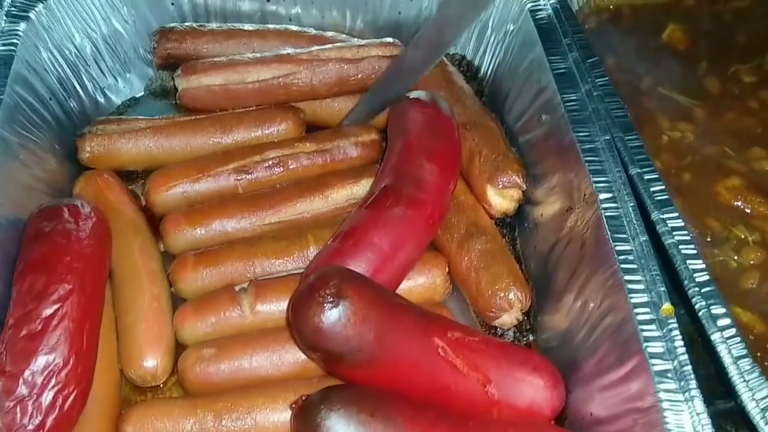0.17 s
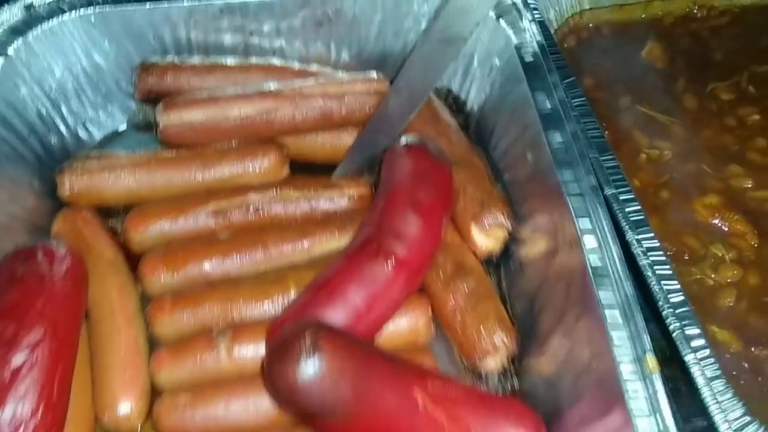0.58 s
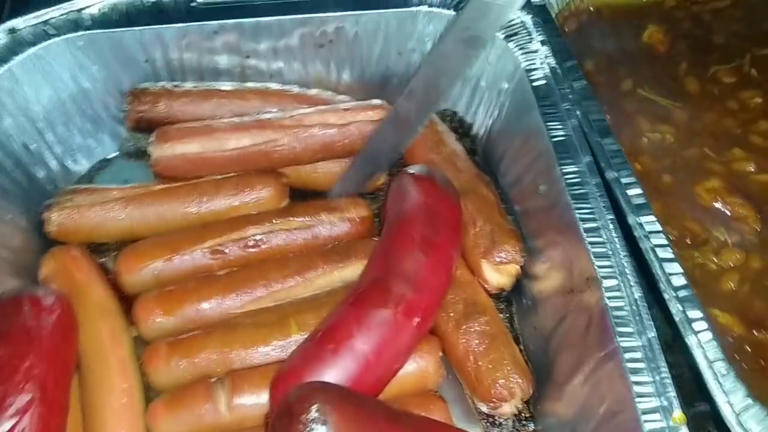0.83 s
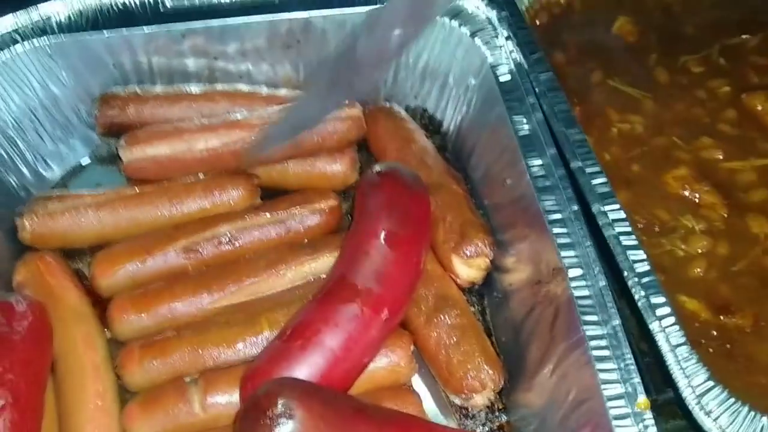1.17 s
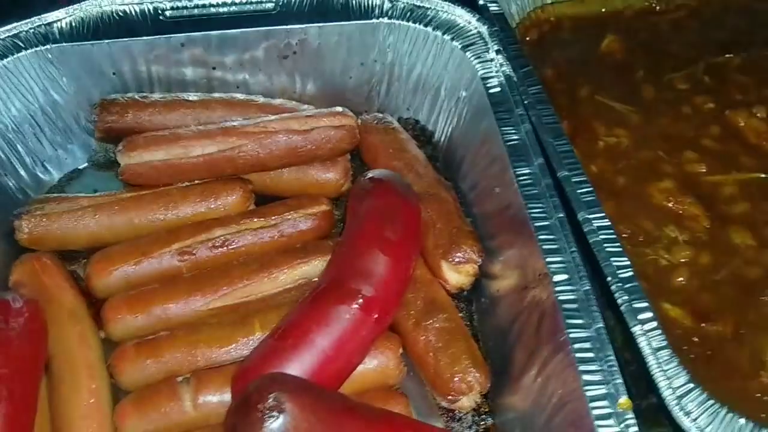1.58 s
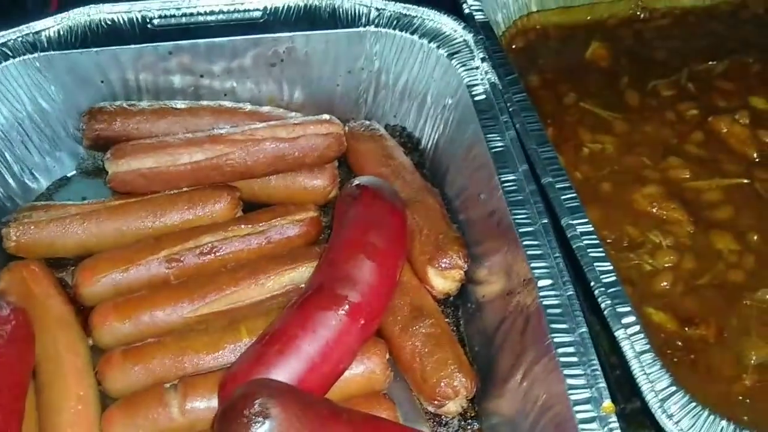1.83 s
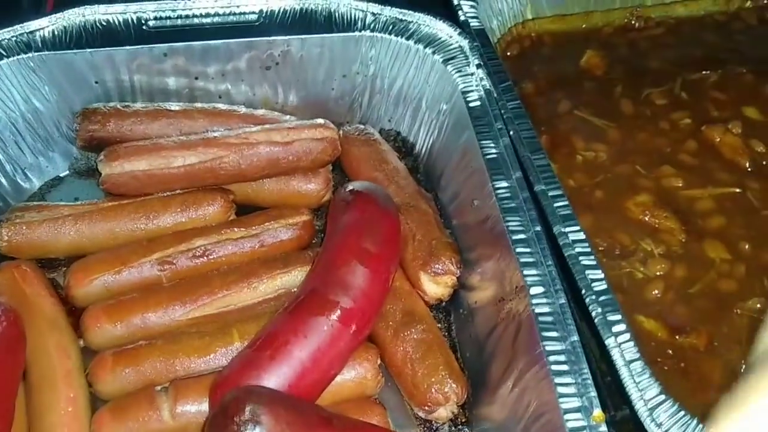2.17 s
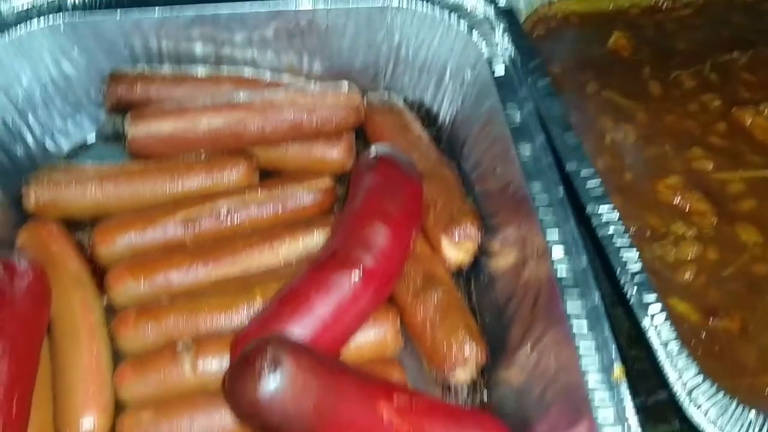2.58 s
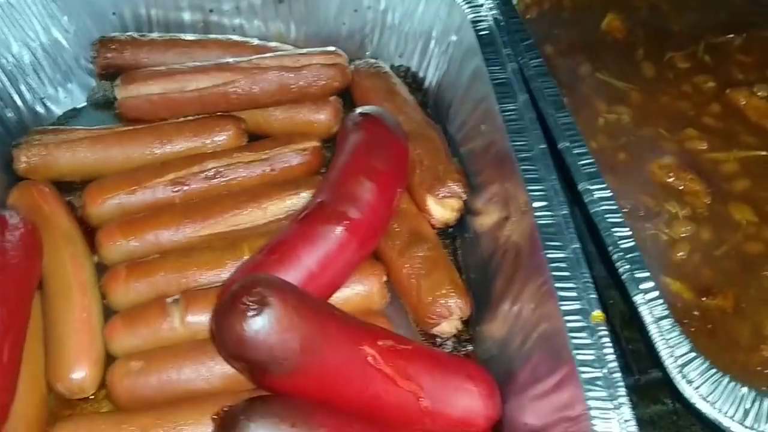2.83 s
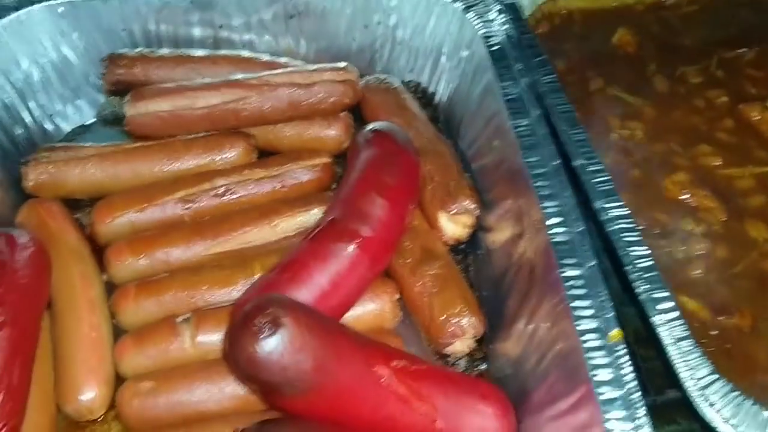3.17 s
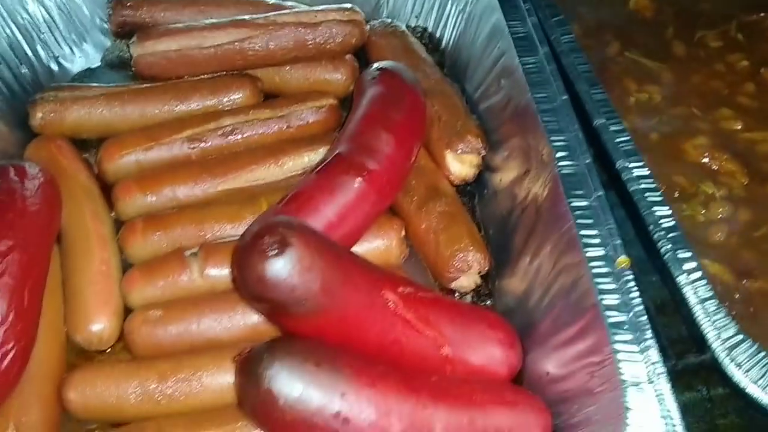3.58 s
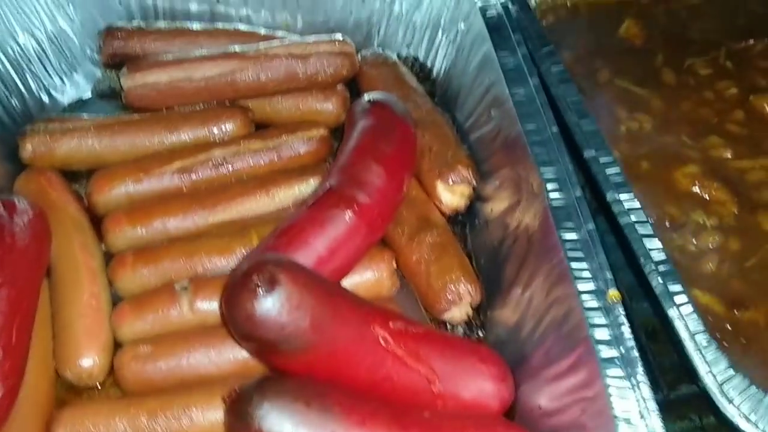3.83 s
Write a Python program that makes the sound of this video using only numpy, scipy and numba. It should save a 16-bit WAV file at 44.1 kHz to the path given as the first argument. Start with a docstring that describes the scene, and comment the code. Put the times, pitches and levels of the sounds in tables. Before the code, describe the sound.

Short rasps, dull pops and bright crinkles come from an aluminium pan as a knife prises sausages loose in a small kitchen.

```python
"""A knife prises sausages loose in a throwaway aluminium foil pan, close by in a small kitchen.
The tip sticks and slips over the ribbed foil, making a rasp, and the thin sheet buckles with dull
pops and bright crinkles. Both make the pan ring, though the food soon damps it, and each push
makes it shudder. Once, the whole pan floor flips with a loud pop.
Behind it are a short room echo and the rush and hum of an appliance."""
import sys
import numpy as np
from scipy import signal
from scipy.fft import rfft, irfft
from scipy.io import wavfile
from scipy.ndimage import uniform_filter1d
from numba import njit

SR = 44100
rng = np.random.default_rng(int(sys.argv[2]) if len(sys.argv) > 2 else 0)


def wrap_up_sound(samples):
    """Save the sound to the file named by the first command line argument, as 16-bit audio."""
    columns = np.atleast_2d(samples).T
    # keep every value between -1 and 1, then stretch to whole-number steps
    tamed = np.clip(columns, -1, 1)
    steps = np.round(tamed * 32767).astype(np.int16)
    wavfile.write(sys.argv[1], SR, steps)


N = 176708
TIME = np.arange(N) / SR

# the tone of the creased foil, whose many notes blur together: pitch_hz, level_db
FOIL_TONE = [(60, -22), (200, 15.5), (450, -0.5), (700, -1.5), (1200, -9), (1650, -4.5), (2500, 2.5),
             (3500, -8.5), (4300, -7), (6000, -13), (8200, -21.5), (10500, -16), (15500, -21.5)]
# each push of the knife: start_s, length_s, panel_pitch_hz, level_db, swell_db, treble_db, song_db
PUSHES = [ (0.474, 0.042, 850, -37.5, -6, -1.5, 2), (0.586, 0.063, 902, -42.5, 4.5, -13.5, -8),
          (0.645, 0.079, 802, -33, 1.5, -9, -14), (.74, .13, 620, -32, -7.5, -16.5, -7),
          (0.871, 0.1, 1037, -38.5, 2.5, -15, -10), (1.019, 0.066, 1240, -37.5, -7.5, -12.5, 9),
          (1.076, 0.041, 1180, -27, -9, -8, -0.5), (1.231, 0.042, 1110, -38, -3.5, -21, -10),
          (1.718, 0.03, 910, -35.5, -0.5, -2, -3), (2.126, 0.037, 912, -44.5, -7, -9.5, 1),
          (2.196, 0.044, 850, -38, -10, -12, -5.5), (2.51, 0.26, 707, -50.5, -18.5, -18, -6),
          (2.731, 0.079, 824, -37, -0.5, -17.5, -16), (2.83, 0.086, 778, -28, -15.5, -16, -9),
          (3.344, 0.059, 900, -51.5, -14.5, -24, -2), (3.392, 0.051, 856, -41.5, -2, -21.5, -8),
          (3.456, 0.079, 1020, -40.5, 4, -21.5, -17), (3.543, 0.074, 860, -22.5, -21.5, -30, -23),
          (3.746, 0.056, 890, -51, 7.5, -0.5, -1.5), (3.975, 0.069, 628, -76.5, -1, 15, -7)]


def undb(db):
    """Turn decibels into a number to multiply by."""
    return 10 ** (np.asarray(db) / 20)


def unit(x):
    """Scale a sound to an average strength (rms) of 1."""
    return x / np.sqrt(np.mean(x ** 2))


def fade(t, t60):
    """A dying away that is 60 dB down after t60 seconds."""
    return np.exp(-np.log(1000) * t / t60)


def wander(turns_per_s):
    """A slow random drift, about 1 to either side of zero."""
    points = rng.standard_normal(2048)
    return 1.2 * np.interp(TIME * turns_per_s, np.arange(len(points)), points)


def colour(x, points):
    """Shape the tone along a curve of (pitch_hz, level_db) points."""
    hz, db = np.transpose(points)
    f = np.maximum(np.fft.rfftfreq(len(x), 1 / SR), 1)
    return irfft(rfft(x) * undb(np.interp(np.log(f), np.log(hz), db)), len(x))


def split(x):
    """Split a sound into body (low), crack (middle) and fizz (high)."""
    # the edges of the three ranges: low_hz, high_hz
    bands = [(70, 1700), (1700, 7000), (7000, 18000)]
    return [signal.sosfilt(signal.butter(4, band, "bandpass", fs=SR, output="sos"), x) for band in bands]


@njit
def resonate(x, hz, q):
    """Let through what lies near a pitch given for every sample; a higher q is narrower."""
    y, band_state, low_state = np.empty(len(x)), 0., 0.
    for i in range(len(x)):
        step = np.tan(np.pi * hz[i] / SR)
        band = (band_state + step * (x[i] - low_state)) / (1 + step * (step + 1 / q))
        band_state = 2 * band - band_state
        low_state += 2 * step * band
        y[i] = band / q
    return y


def focus(x, hz, q):
    """Keep what lies near a steady or moving pitch, at strength 1."""
    return unit(resonate(x, hz * np.ones(len(x)), float(q)))


def note(t, hz, t60):
    """One vibration left to die away, at strength 1."""
    return unit(np.cos(2 * np.pi * hz * t) * fade(t, t60) * (1 - np.exp(-2 * hz * t)))


def appliance():
    """An airy rush makes the casing ring, over a slightly wavering motor hum."""
    # the tone of the rush: pitch_hz, level_db
    rush_tone = [(25, -20), (42, -12.5), (60, -15), (95, 2.5), (145, -8.5), (200, -16), (260, -2),
                 (340, -10), (540, -12.5), (700, -8), (1100, -24), (3300, -31), (8000, -43.5), (15500, -39)]
    # how loud the rush is over time: time_s, level_db
    rush_levels = [(0, -57.5), (.45, -58), (1.4, -55.5), (2.3, -58), (3.1, -58), (4, -57)]
    # the notes of the casing: pitch_hz, width_hz, level_db
    casing_notes = [(239.5, 3.3, -60), (642, 3.2, -64.5)]
    # the notes of the motor: pitch_hz, level_db
    hum_notes = [(58.3, -67), (118.5, -67.5)]
    swell = undb(np.interp(TIME, *np.transpose(rush_levels)) + .8 * wander(6))
    out = unit(colour(rng.standard_normal(N), rush_tone)) * swell
    for hz, width, db in casing_notes:
        out += undb(db) * unit(swell * focus(rng.standard_normal(N), hz, q=hz / width))
    for hz, db in hum_notes:
        phase = 2 * np.pi * np.cumsum(hz * (1 + 0.0055 * wander(12))) / SR
        out += np.sqrt(2) * undb(db + 2 * wander(7)) * np.sin(phase)
    return out


def kitchen_echo(x, wet_db, t60s=(0.26, 0.27, 0.23), build_s=0.003):
    """Sound bounces off the hob and the near walls; the highs die first."""
    t = np.arange(SR // 2) / SR
    parts = split(rng.standard_normal(len(t)))
    tail = sum(part * fade(t, t60) for part, t60 in zip(parts, t60s))
    tail *= 1 - np.exp(-(t / build_s) ** 2)
    return undb(wet_db) * signal.fftconvolve(x, tail / np.linalg.norm(tail))[:N]


def pan_wall_echo(x):
    """Quick echoes off the pan's ribbed sides waver as the point of contact moves."""
    t = np.arange(SR // 25) / SR
    echoes = rng.standard_normal(len(t)) * fade(t, t60=.035)
    bright = colour(x, [(120, -19), (300, -42), (700, -26.5), (1200, -23.5), (2500, -3.5), (8000, -6.5)])
    return signal.fftconvolve(bright * wander(20), echoes / np.linalg.norm(echoes))[:N]


def pressure(start, length, swell_db, grip_s=0.014, release_t60=0.12):
    """One push: the tip bites, bears down or eases off, then comes to rest."""
    t = TIME - start
    held = undb(swell_db * np.clip(t / length, 0, 1))
    return np.clip(t / grip_s, 0, 1) * held * fade(np.maximum(t - length, 0), release_t60)


def pan_shudder(level_db=-40, effort_power=0.2):
    """Every push rocks the whole pan; this low rumble grows only slowly with the force."""
    # the tone of the full pan rocking on the hob: pitch_hz, level_db
    rumble_tone = [(40, -48), (115, -2), (160, -8), (240, 5), (300, -18.5), (450, -13), (900, -48),
                   (3000, -83)]
    effort = sum(pressure(start, length, swell_db) * undb(db)
                 for start, length, _, db, swell_db, *_ in PUSHES)
    return undb(level_db) * effort ** effort_power * unit(colour(rng.standard_normal(N), rumble_tone))


def pan_ring(sheet_t60, sheet_db=0.5, scatter_db=5.94):
    """The pan rings after one click; each spot that is touched gives a new mix of its notes."""
    # the notes of the full pan (wider ones die sooner): pitch_hz, width_hz, level_db
    pan_notes = [(242.7, 73, 5.5), (364.5, 45, 0), (618, 140, -7), (614.3, 54, 5), (758, 50, 1),
                 (734, 8.6, -21.5), (880, 18, 2.5), (1120, 11, -5), (1170, 81, 0.5), (1311, 47, -3.5),
                 (1455, 15, -0.5), (1840, 64.7, -14), (2550, 78, -12.5), (2576, 19, -4), (3015, 35, -21),
                 (3284, 22, -6), (4030, 15, -18.5)]
    t = np.arange(SR // 7) / SR
    hz, width, db = np.transpose(pan_notes)[:, :, None]
    weight = rng.choice([-1, 1], hz.shape) * undb(db + scatter_db * rng.standard_normal(hz.shape))
    notes = np.sum(weight * width * np.sin(2 * np.pi * hz * t) * np.exp(-np.pi * width * t), axis=0)
    sheet = colour(rng.standard_normal(len(t)), FOIL_TONE) * fade(t, sheet_t60)
    return unit(notes) + undb(sheet_db) * unit(sheet)


def floor_pop(width_cycles=0.8):
    """The whole floor of the pan gives way in one big swing."""
    # the flip of the floor: time_s, pitch_hz, peak_db
    flip = (.7233, 900, -6)
    time_s, pitch_hz, peak_db = flip
    cycles = (TIME - time_s) * pitch_hz
    swing = np.sin(2 * np.pi * cycles) * np.exp(-(cycles / width_cycles) ** 2)
    return undb(peak_db) * swing / np.max(swing)


def foil_snaps(tick_db=-3, ping_db=-4, overtone_ratio=1.7, overtone_db=-5):
    """A patch of foil flips over: a tick, the patch's own note and ping, and the ring of the pan."""
    # each buckle of the foil or knock of the blade:
    # start_s, panel_pitch_hz, ping_pitch_hz, body_db, crack_db, fizz_db
    snaps = [ (0.4863, 754, 2666, -24.5, -25.5, -54), (0.491, 1074, 2760, -24.5, -56, -67),
             (0.4988, 655, 2300, -26, -39, -46), (0.5925, 1013, 1850, -31, -41.5, -53),
             (0.6184, 890, 2190, -29, -35, -47.5), (0.674, 975, 1810, -28, -34, -55),
             (0.7224, 590, 1720, -17.5, -34, -56), (0.725, 514, 2290, -22.5, -39, -35),
             (0.7341, 638, 1990, -25, -39, -45), (0.922, 1460, 2350, -32.5, -43, -63),
             (0.936, 880, 2280, -41.5, -34, -45.5), (0.975, 1190, 2370, -50, -46, -47),
             (1.0117, 1030, 1780, -31.5, -41.5, -54), (1.0932, 987, 1860, -28, -36, -41),
             (1.0968, 1050, 1684, -22, -27.5, -33), (1.107, 995, 2175, -26, -33, -39),
             (1.1935, 1200, 1740, -40.5, -46.5, -52.5), (1.232, 1422, 2600, -27, -32.5, -49),
             (1.7161, 910, 3520, -30.5, -35.5, -31), (1.7226, 883, 3670, -21, -45, -46),
             (1.725, 590, 3570, -31, -55, -56), (2.132, 992, 1950, -35.5, -37.5, -41),
             (2.204, 1260, 3053, -41, -33, -44), (2.454, 896, 2280, -48, -55.5, -62.5),
             (2.706, 1162, 2670, -46, -55, -63), (2.7419, 858, 2480, -31.5, -43, -69),
             (2.755, 735, 2320, -29, -40, -49), (2.777, 829, 2210, -35, -39, -44),
             (2.8, 844, 2220, -38, -42, -54), (2.8331, 808, 1928, -28, -26.5, -35),
             (2.841, 869, 2227, -23.5, -29.5, -46), (3.238, 717, 2005, -70, -57, -69),
             (3.422, 880, 2514, -38, -41.5, -65), (3.47, 830, 1910, -39.5, -41, -63),
             (3.493, 815, 1830, -36.5, -44, -71), (3.529, 1143, 2430, -32, -40, -49),
             (3.5435, 1067, 2440, -21, -28, -41.5), (3.562, 788, 1854, -23, -25.5, -34),
             (3.6215, 980, 1696, -32.5, -33.5, -55), (3.691, 260, 1980, -37.5, -67, -78)]
    out = np.zeros(N + SR)
    attack = SR // 125  # the first 8 ms set each part's level
    for start_s, panel_hz, ping_hz, *levels_db in snaps:
        ring = pan_ring(sheet_t60=0.064)
        t = np.arange(len(ring)) / SR
        tick = unit(colour(rng.standard_normal(len(t)), FOIL_TONE) * fade(t, t60=0.023))
        body, crack, fizz = split(ring + undb(tick_db) * tick)
        # the patch stirs most the pan notes near its own
        body = focus(body, panel_hz, q=0.98) + note(t, panel_hz, t60=0.053)
        # a small tight patch pings like a drum skin, with one out-of-tune overtone
        ping = note(t, ping_hz, t60=0.055)
        ping += undb(overtone_db) * note(t, overtone_ratio * ping_hz, t60=0.055)
        crack = focus(crack, ping_hz, q=0.42) + undb(ping_db) * ping
        # the food damps the highest notes first
        fizz = focus(fizz, hz=13000, q=0.47) * fade(t, t60=.12)
        start = int(start_s * SR)
        for part, db in zip((body, crack, fizz), levels_db):
            out[start:start + len(t)] += undb(db) * part / np.std(part[:attack])
    return out[:N]


def knife_scrape(slips_per_s=1700, spots=5, scatter_db=0.5, grit_db=-9, wander_db=3,
                 rasp_base_hz=4600, treble_db_per_octave=20, crack_share=0.42):
    """The tip sticks and slips; each tiny slip rings the pan while the point of contact wanders."""
    ringing = 0
    for _ in range(spots):
        slip_here = rng.random(N) < slips_per_s / spots / SR
        slips = slip_here * undb(scatter_db * np.clip(rng.standard_normal(N), -2, 2))
        force = (unit(slips) + undb(grit_db) * rng.standard_normal(N)) * undb(wander_db * wander(18))
        ringing = ringing + signal.fftconvolve(force, pan_ring(sheet_t60=0.024))[:N]
    # each push has its own pitches: one for the foil panel under the tip, one for the rasp
    starts, lengths, pitches, _, _, trebles, _ = np.transpose(PUSHES)
    middles = starts + lengths / 2
    panel_hz = np.interp(TIME, middles, pitches)
    rasp_hz = np.interp(TIME, middles, rasp_base_hz * 2 ** (trebles / treble_db_per_octave))
    body, crack, fizz = split(ringing)
    body = focus(body, panel_hz, q=0.58)
    song = focus(focus(force, panel_hz, q=9.8), panel_hz, q=0.58)
    crack = focus(crack, rasp_hz, q=0.51)
    # even out the strength over 25 ms, so that the hand's pressure sets it
    body, song, crack, fizz = (part / np.sqrt(uniform_filter1d(part ** 2, SR // 40) + 1e-12)
                               for part in (body, song, crack, fizz))
    out = 0
    for start, length, _, db, swell_db, treble_db, song_db in PUSHES:
        # bare foil rasps brightly, greasy foil dully; a panel sings when no food lies on it
        rasp = body + undb(song_db) * song + undb(crack_share * treble_db) * crack + undb(treble_db) * fizz
        out = out + undb(db) * pressure(start, length, swell_db) * rasp
    return out


def two_ports(x, treble_lag_s=.000448):
    """Two microphone openings of opposite polarity, about half a ms apart: the right side is a copy shifted
    differently at each pitch; treble leans left."""
    # how far the left wave runs ahead of the right: pitch_hz, lead_radians
    left_lead = [(20, 2.8), (110, 2.45), (240, 1.85), (330, 1.15), (480, .4), (1100, .1), (1550, .5),
                 (1800, 2.1), (2200, 3.14), (2600, 3.9), (3000, 5.6), (3700, 6.8), (4400, 9.3)]
    f = np.fft.rfftfreq(N, 1 / SR)
    hz, radians = np.transpose(left_lead)
    lead = np.interp(f, hz, radians) + 2 * np.pi * treble_lag_s * np.maximum(f - hz[-1], 0)
    lean = undb(np.interp(f, [60, 300, 2000, 8000], [-1.7, .4, .2, 2.6]) / 2)
    spectrum = rfft(x)
    return np.array([irfft(spectrum * lean, N), irfft(spectrum / lean * np.exp(-1j * lead), N)])


def scene():
    """Pan, room and appliance in stereo; each side also gets some echoes of its own."""
    # thin foil gives off little upper bass; both curves are pitch_hz, level_db
    pan_tone = [(80, 8), (180, -14), (260, -4), (450, -4.5), (1100, -0.5), (1900, -1.0), (3000, -2.5)]
    echo_tone = [(120, 2.5), (300, 11.5), (700, -2), (2500, -10.5), (8000, -2.5)]
    pan = colour(foil_snaps() + knife_scrape(), pan_tone) + floor_pop()
    shared = two_ports(pan + kitchen_echo(pan, wet_db=-16.5) + pan_shudder() + appliance())
    into_room = colour(pan, echo_tone)
    side_echoes = [pan_wall_echo(pan) + kitchen_echo(into_room, wet_db=-12) for _ in range(2)]
    return shared + np.array(side_echoes)


def record(dry, top_hz=15700):
    """Cut away the very highest treble."""
    return signal.sosfilt(signal.ellip(8, .2, 70, top_hz, fs=SR, output="sos"), dry)


dry = scene()
out = record(dry)
wrap_up_sound(out)
```